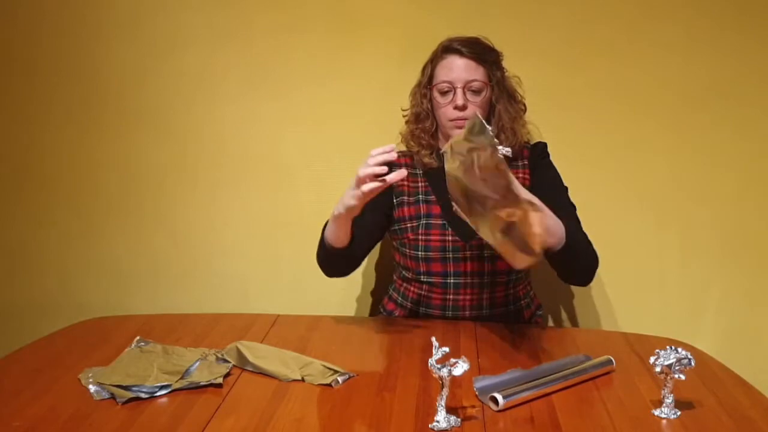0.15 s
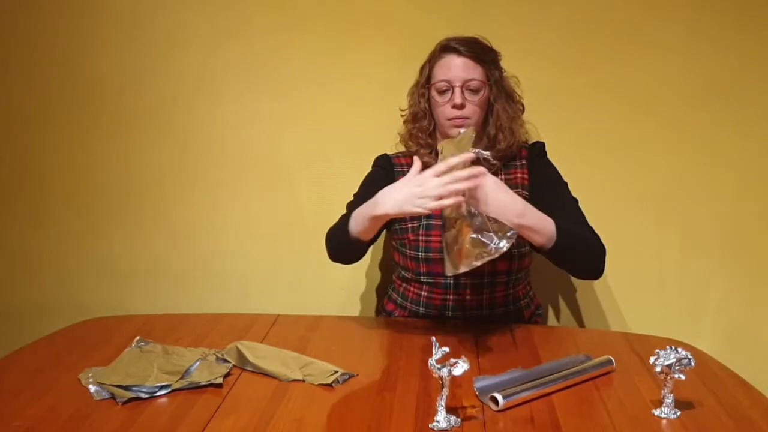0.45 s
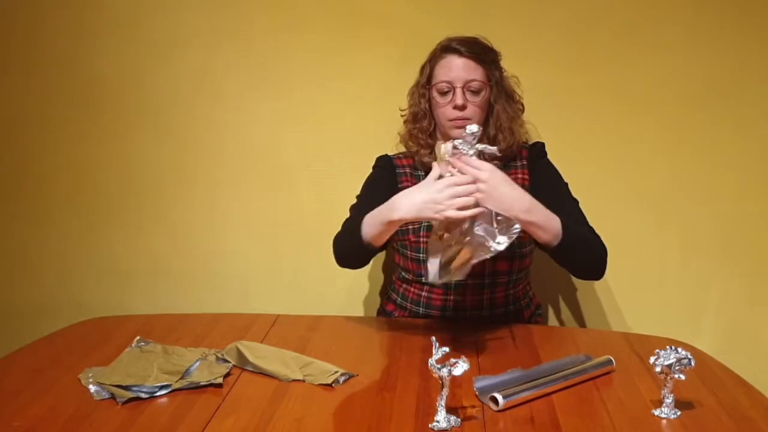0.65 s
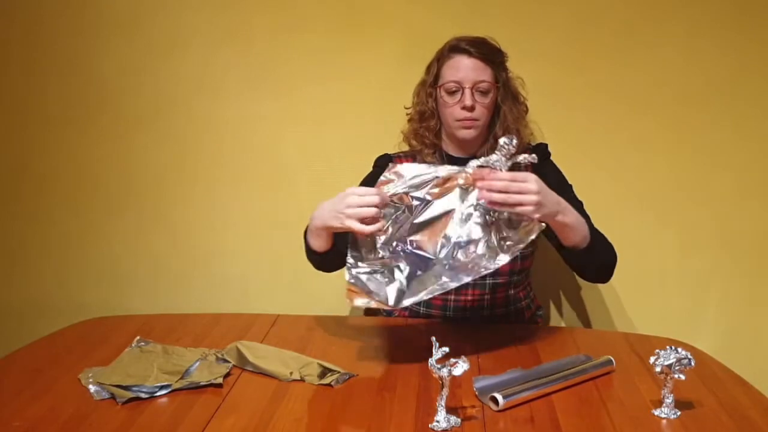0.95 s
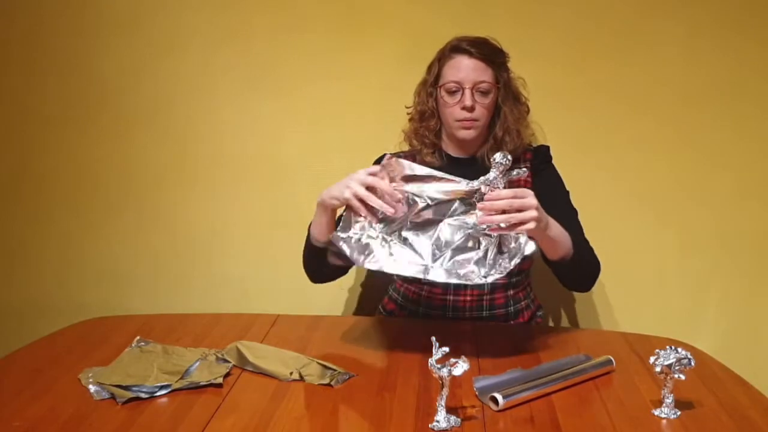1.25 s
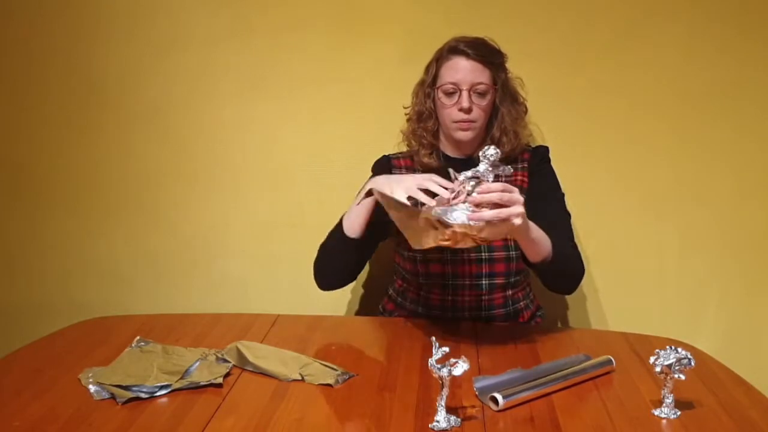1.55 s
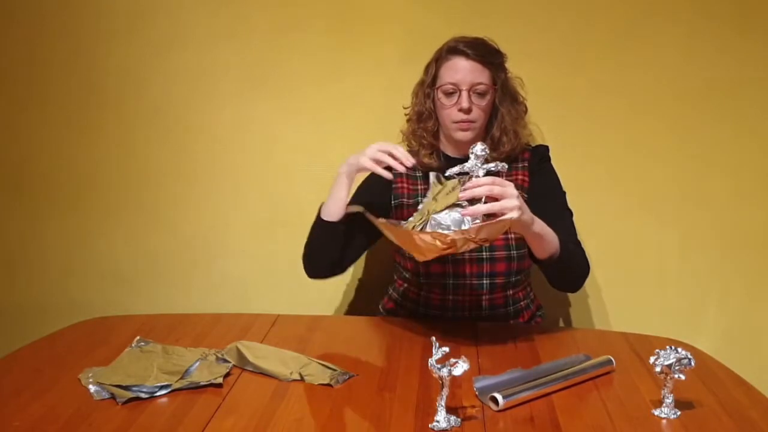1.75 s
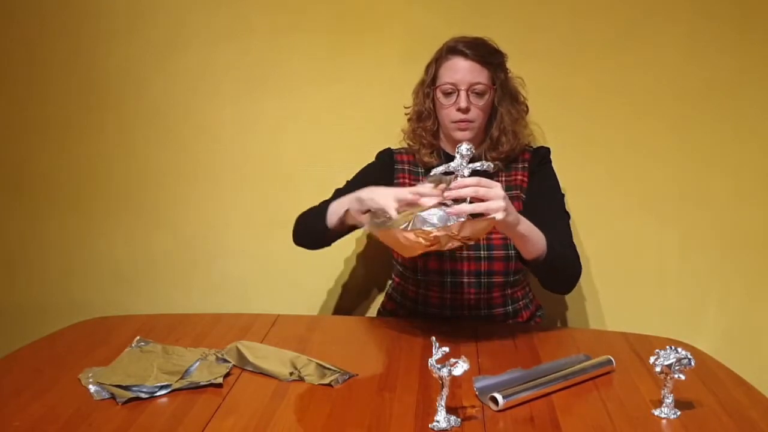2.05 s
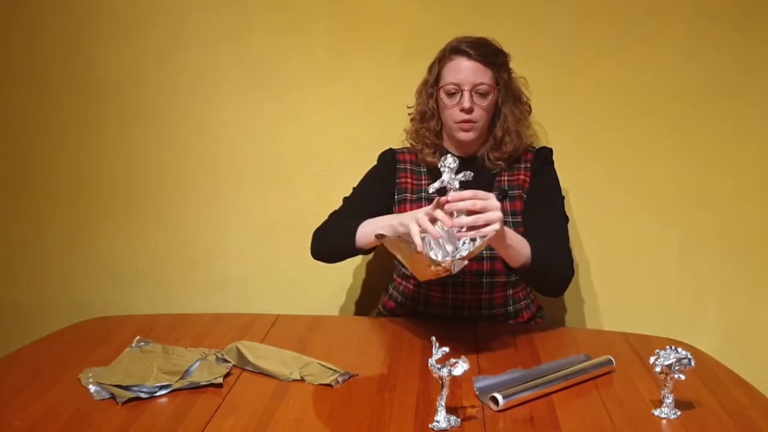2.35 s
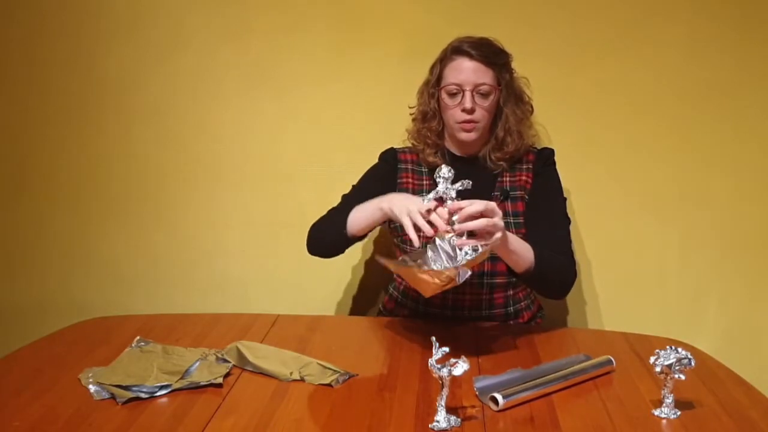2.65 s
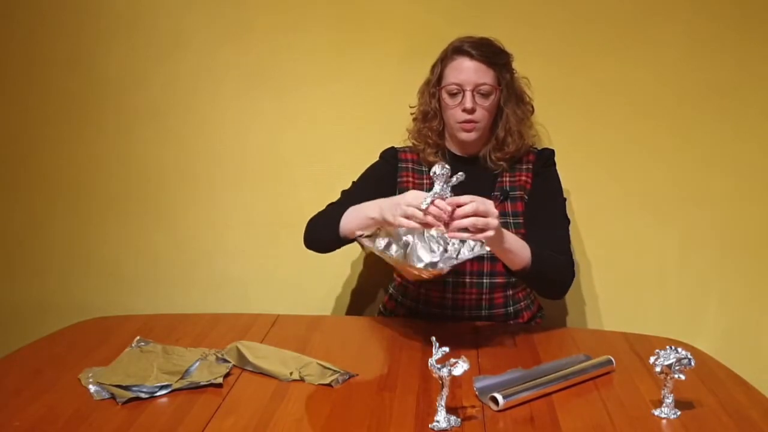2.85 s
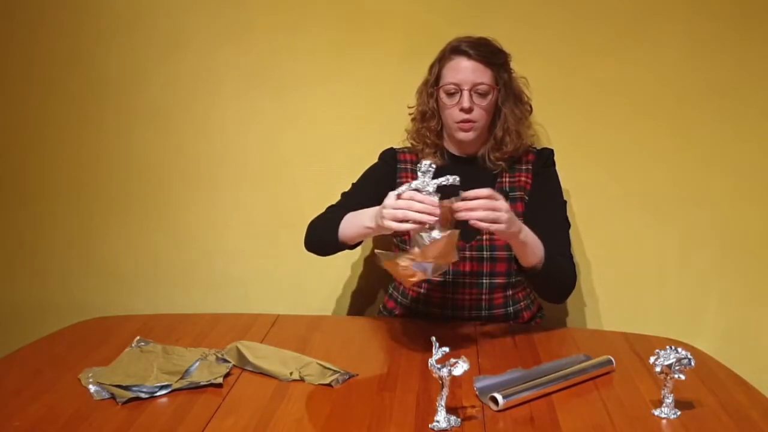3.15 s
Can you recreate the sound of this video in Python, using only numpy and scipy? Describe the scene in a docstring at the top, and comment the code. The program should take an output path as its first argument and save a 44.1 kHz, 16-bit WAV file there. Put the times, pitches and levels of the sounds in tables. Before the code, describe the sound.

Aluminium foil crackles at once, thin and light with small ticks until 0.5 s. It swells into dense, bright crumpling, strongest around 1.0-1.6 s, with sharp snaps, tiny metallic pings and soft low sheet flaps near 1.1 and 1.4 s. It thins at 1.75-1.95 s, bursts back at 2.0, snaps hard around 2.2-2.35, then crinkles unevenly, swelling near 2.95-3.15 before easing. Short small-room tail, very faint hiss.

```python
"""Crisp, dense crackle starts at once: a large sheet of aluminium foil is worked by hand in a small quiet room.
Tiny creases buckle in avalanches, and each click leaves the sheet ringing as briefly fading noise.
Bigger creases snap as dying runs of clicks, and tiny facets ping as short sine tones.
Panels knock low and hollow and small stiff facets ring high, each as three damped modes.
The loose sheet flaps with a soft low thud over stirred air; a short room tail and a faint floor lie behind."""
import sys
import numpy as np
from scipy import signal
from scipy.fft import rfft, irfft
from scipy.io import wavfile

SR = 44100
rng = np.random.default_rng(int(sys.argv[2]) if len(sys.argv) > 2 else 0)


def pcm_store(signal):
    """Save signal as 16-bit PCM."""
    levels = np.round(np.clip(np.atleast_2d(signal), -1, 1) * 32767)
    wavfile.write(sys.argv[1], SR, levels.astype(np.int16).T)


N = 145530  # samples in the scene

# spectrum of the crackling sheet, shared by creases and facets: [frequency_hz, level_db]
FOIL_SPECTRUM = [(100, -48), (160, -11.5), (275, -9), (420, -2), (700, -3.5), (1080, 0), (1830, -1.5),
                 (3100, 4.5), (5050, 1), (7400, 3.5), (9600, -6.5), (11900, -7), (14200, -14.5),
                 (16000, -27)]

USUAL_EFFORT_DB = -34  # effort at which rates and brightness are neutral
BOTTOM_HZ, TOP_HZ = 40.3, 15800  # limits of the recorder


def undb(db):
    """Decibels to gain."""
    return 10 ** (np.asarray(db) / 20)


def unit(x):
    """Scale to rms 1."""
    return x / np.sqrt(np.mean(x ** 2))


def add(out, start_s, x):
    """Mix x into out from a time on."""
    i = max(int(start_s * SR), 0)
    out[i:i + len(x)] += x[:max(len(out) - i, 0)]


def colour(x, points):
    """Filter by a spectrum of (Hz, dB) points, keeping the power of white noise."""
    hz, db = np.array(points).T
    f = np.maximum(np.fft.rfftfreq(len(x), 1 / SR), 1)
    gain = unit(undb(np.interp(np.log(f), np.log(hz), db)))
    return irfft(rfft(x) * gain, len(x))


def band(x, hz, kind, order=4):
    """Low-, band- or high-pass filter."""
    sos = signal.butter(order, np.minimum(hz, SR / 2 - 1), kind, fs=SR, output="sos")
    return signal.sosfilt(sos, x)


def floor_noise():
    """Faint steady noise behind the foil."""
    # spectrum of the floor: [frequency_hz, level_db]
    floor_spectrum = [(60, -6), (200, -16), (1000, 9), (5000, -12)]
    return undb(-56.5) * colour(rng.standard_normal(N), floor_spectrum)


def room(x):
    """Table and walls return a short tail whose treble dies first."""
    gap_s, split_hz, level_db = 0.00442, 7960, -16
    low_t60_s, treble_t60_s = 0.57, 0.25  # time to fall by 60 dB
    t = np.arange(SR // 2) / SR
    tail = 0
    for kind, t60_s in (("lowpass", low_t60_s), ("highpass", treble_t60_s)):
        noise = band(rng.standard_normal(len(t)), split_hz, kind)
        tail = tail + noise * np.exp(-np.log(1000) * t / t60_s)
    tail = (t > gap_s) * tail
    return x + undb(level_db) * signal.fftconvolve(x, tail / np.linalg.norm(tail))[:N]


def effort():
    """Gain that follows how hard the hands work the foil."""
    # effort of the hands, joined by straight lines in dB: [time_s, level_db]
    effort_curve = [(0.01, -33), (0.075, -44), (0.13, -41.5), (0.3, -48.5), (0.385, -42), (0.499, -51.5),
                    (0.511, -37), (0.66, -34), (0.79, -35), (0.879, -32), (1.03, -27), (1.07, -31),
                    (1.16, -30.5), (1.25, -34), (1.41, -32.5), (1.468, -34.5), (1.525, -29), (1.598, -34),
                    (1.69, -35.5), (1.76, -44), (1.972, -48.5), (1.99, -30), (2.052, -35.5), (2.15, -28.5),
                    (2.22, -31.5), (2.411, -31.5), (2.502, -42), (2.621, -34), (2.69, -41), (2.8, -36),
                    (2.87, -36.5), (2.96, -30.5), (3.05, -34.5), (3.133, -29.5), (3.21, -42.5), (3.29, -42)]
    when_s, db = np.array(effort_curve).T
    return undb(np.interp(np.arange(N) / SR, when_s, db))


def flaps(size=8192):
    """The loose sheet pushes air: a few low cycles for each flap over a soft flutter."""
    # flaps of the sheet, level before the envelope: [start_s, level_db, pitch_hz]
    flap_events = [(0.626, -42, 114), (1.015, -40, 131), (1.074, -30, 75), (1.264, -31, 68.6),
                   (1.364, -31.5, 78), (1.396, -26.5, 68), (1.994, -37, 75), (2.135, -34, 72),
                   (2.906, -40, 139)]
    # spectrum of the moving air: [frequency_hz, level_db]
    air_spectrum = [(20, -30), (48, 9.5), (75, 6.5), (180, 0.5), (300, 2), (600, -22.5)]
    attack_s, decay_s = 0.0075, 0.013
    sway_db, sway_growth = -21, 0.33  # stirred air against the effort, extra dB per dB of effort
    out, t = np.zeros(N), np.arange(size) / SR
    envelope = np.minimum(t / attack_s, 1) * np.exp(-t / decay_s)
    for start_s, db, hz in flap_events:
        flutter = unit(colour(rng.standard_normal(size), air_spectrum))
        swing = np.sin(2 * np.pi * hz * t) + 0.64 * flutter
        add(out, start_s, undb(db) * swing * envelope)
    work = effort()
    stirred_air = colour(rng.standard_normal(N), air_spectrum) * work
    return out + stirred_air * (work / undb(USUAL_EFFORT_DB)) ** sway_growth * undb(sway_db)


def pings(size=1024):
    """Small facets between the creases ring briefly, each at its own pitch."""
    pings_per_s, decay_s, level_db = 900, 0.00091, -11.5  # level against the effort
    centre_hz, reach = 5035, 0.896  # pitches reach this log ratio to either side
    out, t = np.zeros(N), np.arange(size) / SR
    for when, pitch, strength in rng.random((int(pings_per_s * N / SR), 3)):
        hz = centre_hz * np.exp(reach * (2 * pitch - 1))
        tone = np.sin(2 * np.pi * hz * t) * np.exp(-t / decay_s)
        add(out, when * N / SR, strength ** 2 * tone)  # squared: most are weak
    return unit(colour(out, FOIL_SPECTRUM)) * effort() * undb(level_db)


def knocks_and_rings(size=2048):
    """Panels knock low and hollow, small stiff facets ring high: three damped modes a little above a base pitch."""
    # panels (low rows) and stiff facets (high rows), level before the mode gains:
    # [start_s, level_db, base_pitch_hz]
    struck_events = [(.262, -28, 856), (.319, -31, 3050), (0.34, -34, 3150), (.61, -30, 2440),
                     (.726, -29, 970), (.807, -29.5, 590), (1.016, -27, 1040), (1.078, -27.5, 368),
                     (1.355, -26, 2840), (1.534, -17.5, 840), (2.074, -34, 630), (2.183, -23, 4550),
                     (2.273, -24, 1410), (2.368, -26.5, 474), (2.602, -34, 276)]
    decay_s, spread = 0.0031, 0.435
    modes = ((0.29, 0.12), (0.099, 0.97), (0.62, 0.25))  # step in spreads (log ratio), gain
    out, t = np.zeros(N), np.arange(size) / SR
    for start_s, db, hz in struck_events:
        tone = sum(gain * np.sin(2 * np.pi * hz * np.exp(step * spread) * t) for step, gain in modes)
        add(out, start_s, undb(db) * tone * np.exp(-t / decay_s))
    return out


def ring(clicks, decay_s, ring_db):
    """Each click leaves the sheet ringing briefly in countless close modes, heard as fading noise."""
    fade = np.exp(-2 / (decay_s * SR))
    energy = signal.lfilter([1 - fade], [1, -fade], clicks ** 2)
    ringing = np.sqrt(energy) * rng.standard_normal(len(clicks))
    return (clicks + undb(ring_db) * ringing) / np.hypot(1, undb(ring_db))


def snaps(size=4096):
    """A big crease gives way: one crack sets off a dying run of clicks, coloured by its own patch of foil."""
    # big creases snapping, level before the trim, decay of the run: [start_s, level_db, decay_s]
    snap_events = [(0.095, -33, 0.033), (0.126, -30.5, 0.013), (.162, -34, 0.0071), (0.191, -25.5, 0.00063),
                   (0.211, -28.5, 0.011), (0.231, -25, 0.0056), (0.262, -30.5, 0.0041),
                   (.318, -30.5, 0.0026), (.3359, -29.5, .003), (.342, -33, 0.015), (0.3656, -31, 0.012),
                   (.45, -41, .005), (0.506, -35.5, 0.033), (.531, -26, .014), (.636, -23, 0.0092),
                   (.697, -27.5, .001), (.726, -26.5, 0.0096), (.806, -24.5, 0.0021), (.841, -26.5, .016),
                   (0.863, -22.5, 0.034), (.885, -24.5, 0.019), (0.93, -29, 0.0031), (.96, -29, .002),
                   (.978, -25, 0.0063), (.995, -28, 0.011), (1.018, -25, .012), (1.039, -21, 0.0061),
                   (1.091, -23.5, 0.022), (1.1645, -21.5, .005), (1.272, -25.5, .008),
                   (1.327, -25.5, 0.0057), (1.373, -20.5, 0.011), (1.394, -26, 0.029), (1.451, -27, 0.0018),
                   (1.476, -19, .0006), (1.533, -27, 0.0073), (1.572, -27.5, 0.0064), (1.604, -24, 0.0084),
                   (1.805, -35, 0.018), (1.858, -36.5, 0.0025), (1.9012, -32.5, .003),
                   (1.958, -36.5, 0.0073), (1.984, -27, 0.0052), (1.9899, -22, .007), (2.067, -24.5, 0.005),
                   (2.183, -19.5, 0.0014), (2.193, -21.5, 0.011), (2.239, -25, 0.007),
                   (2.257, -21.5, 0.016), (2.274, -16, 0.0013), (2.3337, -18.5, 0.0085),
                   (2.399, -26.5, 0.014), (2.423, -23.5, 0.0027), (2.51, -34.5, .004), (2.567, -28, 0.0027),
                   (2.609, -32, 0.013), (2.834, -33, 0.0016), (2.944, -27.5, 0.011), (2.964, -29, .008),
                   (3.114, -24.5, 0.0092), (3.235, -32, .014)]
    # spectrum of the snaps: [frequency_hz, level_db]
    snap_spectrum = [(150, -38), (600, 0), (1800, -2), (3200, 5), (5000, 0), (7500, 6), (9500, 1),
                     (12000, 4), (14000, -4.5), (16000, -14.5)]
    trim_db, clicks_per_s = -3.5, 2700
    ring_s, ring_db = 0.0068, -0.5  # ring against the clicks
    patch_hz, patch_spread, patch_width, patch_db = 5070, 0.38, 0.046, 1.5  # spread, width: log ratios
    crack_db = 5.5  # first click, strongest when the crease gives way all at once
    out, t = np.zeros(N), np.arange(size) / SR
    for start_s, db, decay_s in snap_events:
        run = (rng.random(size) < clicks_per_s / SR) * rng.standard_normal(size) * np.exp(-t / decay_s)
        run[0] = 1
        burst = ring(run, ring_s, ring_db)
        hz = min(patch_hz * np.exp(patch_spread * rng.standard_normal()), SR / 4)
        patch_edges = hz * np.exp([-patch_width, patch_width])
        burst = burst + undb(patch_db) * band(burst, patch_edges, "bandpass", order=1)
        # longer runs carry more energy
        burst = burst / np.linalg.norm(burst) * np.sqrt((decay_s + ring_s) * SR / 2)
        burst[0] = undb(crack_db) * ring_s / (decay_s + ring_s)
        add(out, start_s, burst * undb(db + trim_db))
    return colour(out, snap_spectrum)


def density():
    """Rate of creases against the usual one: gentle handling gives sparse ticks."""
    return (effort() / undb(USUAL_EFFORT_DB)) ** 0.7


def creases():
    """Tiny creases buckle at random, partly in avalanches; most are small, a few large."""
    creases_per_s = 1800  # at the usual effort
    avalanches_per_s, avalanche_s, avalanche_share = 130, 0.0028, 0.37
    size_spread_db, biggest = 2, 3  # sizes are exponential in dB, up to this many spreads
    starts = (rng.random(N) < avalanches_per_s / SR) * 1.
    bunch = signal.lfilter([1], [1, -np.exp(-1 / (avalanche_s * SR))], starts)
    bunching = 1 - avalanche_share + avalanche_share * bunch / bunch.mean()
    rate = creases_per_s * density() * bunching
    sizes = undb(size_spread_db * np.minimum(rng.exponential(size=N), biggest))
    return (rng.random(N) < rate / SR) * sizes * rng.choice([-1, 1], N)


def crackle():
    """Creases ring four ranges of the sheet; size weighs most on lows and top, effort lifts treble and top."""
    # colour of the crackle, gains added to treble (and top) and to lows: [time_s, treble_db, low_db]
    tone_curve = [(0.05, -2.5, -1.5), (0.25, 7, 2.5), (0.45, -0.5, -5.5), (0.7, 0, -2.5), (0.9, -1, -4.5),
                  (1.03, 1, -3.5), (1.25, 0, -3), (1.5, -0.5, -2), (1.85, 1, -5), (2.3, -4.5, -4.5),
                  (2.799, 3, -3.5), (2.95, -5.5, -3.5), (3.25, 0, -3)]
    # lows, mids, treble, top: [level_db, ring_s, crease_size_power, extra_db_per_db_of_effort]
    sheet_ranges = [(-0.5, 0.0066, 1.01, 0.), (0.5, 0.013, 0.28, 0.), (-2, 0.011, 0.31, 0.42),
                    (-2, 0.0056, 1.73, 0.66)]
    edges_hz = (BOTTOM_HZ, 1837, 5760, 9900, SR / 2)
    ring_db, crease_colour_db, level_db = 4.5, 4, -4.5  # ring against click, random spread, overall
    t, clicks, work = np.arange(N) / SR, creases(), effort()
    when_s, treble_db, low_db = np.array(tone_curve).T
    treble = undb(np.interp(t, when_s, treble_db))
    low = undb(np.interp(t, when_s, low_db))
    out = 0
    for k, (settings, tone) in enumerate(zip(sheet_ranges, (low, 1, treble, treble))):
        db, ring_s, power, growth = settings
        spread = undb(crease_colour_db * rng.standard_normal(N))
        push = np.sign(clicks) * np.abs(clicks) ** power * spread
        # denser creases do not raise the level; the effort sets it below
        ringing = ring(push / np.sqrt(density()), ring_s, ring_db)
        sheet = band(colour(ringing, FOIL_SPECTRUM), edges_hz[k:k + 2], "bandpass")
        brightening = (work / undb(USUAL_EFFORT_DB)) ** growth
        out = out + unit(sheet) * undb(db) * tone * brightening
    return out * work * undb(level_db)


def scene():
    """The foil in the room, over a faint floor."""
    foil = crackle() + pings() + snaps() + knocks_and_rings() + flaps()
    return (room(foil) + floor_noise())[None]


def record(dry):
    """The recorder cuts the deepest bass and the top."""
    bass_cut = band(dry, BOTTOM_HZ, "highpass", order=3)
    top_cut = signal.ellip(10, .2, 80, TOP_HZ, fs=SR, output="sos")  # ripple and stopband in dB
    return signal.sosfilt(top_cut, bass_cut)


dry = scene()
out = record(dry)
pcm_store(out)
```